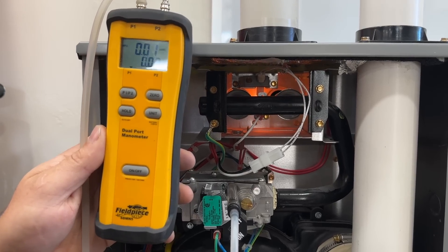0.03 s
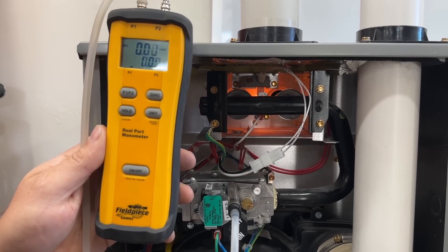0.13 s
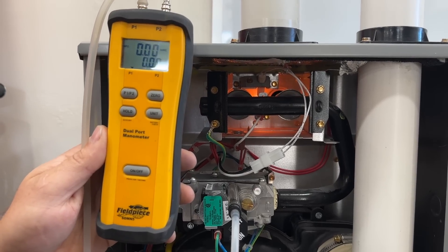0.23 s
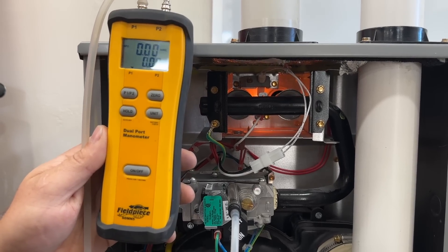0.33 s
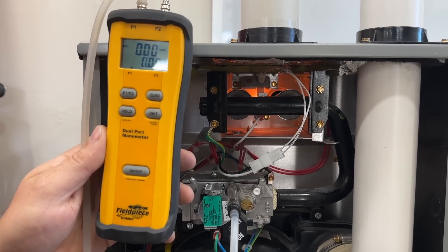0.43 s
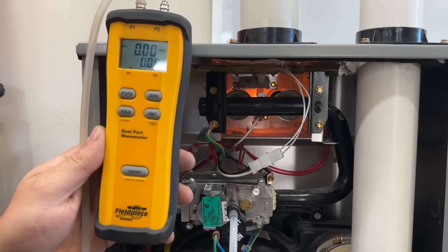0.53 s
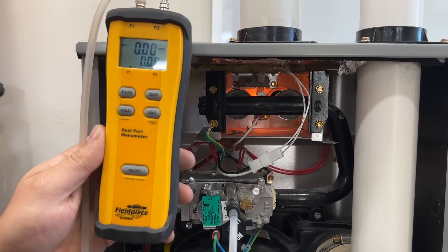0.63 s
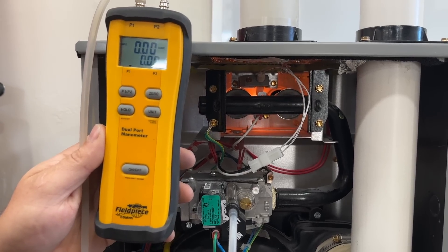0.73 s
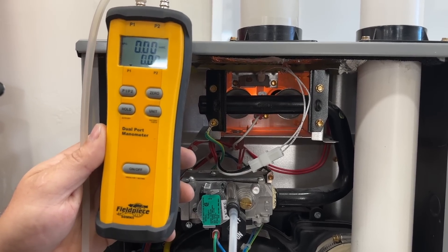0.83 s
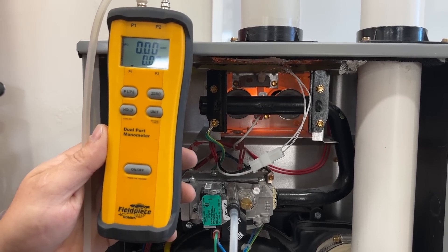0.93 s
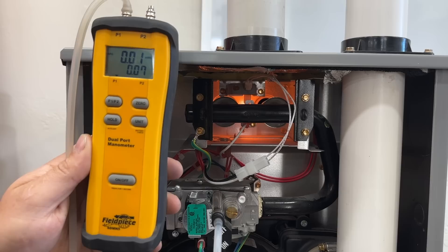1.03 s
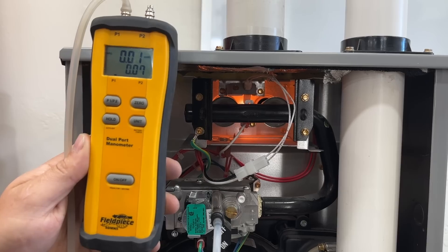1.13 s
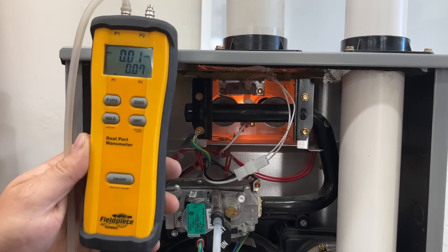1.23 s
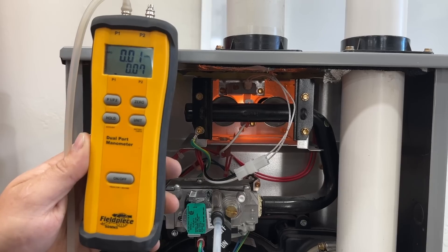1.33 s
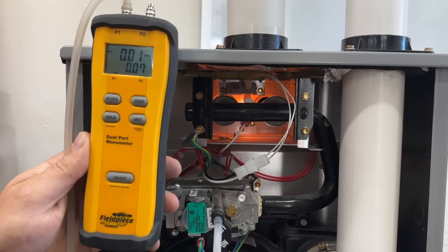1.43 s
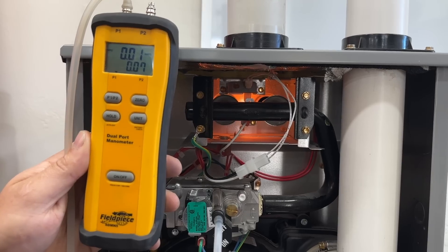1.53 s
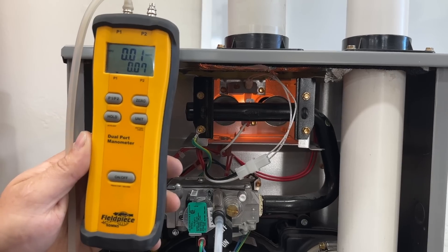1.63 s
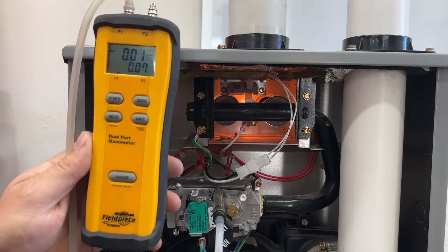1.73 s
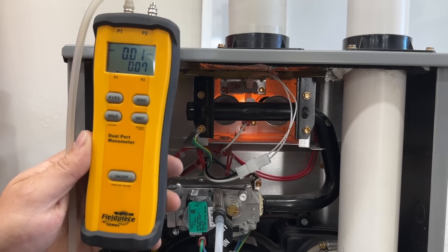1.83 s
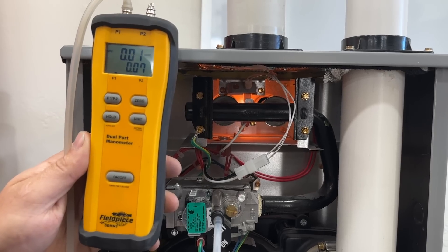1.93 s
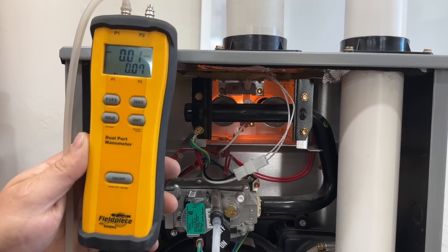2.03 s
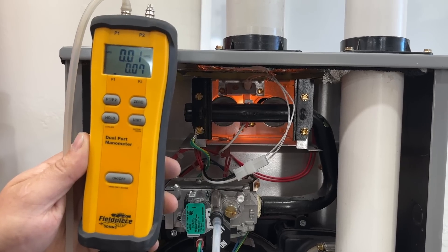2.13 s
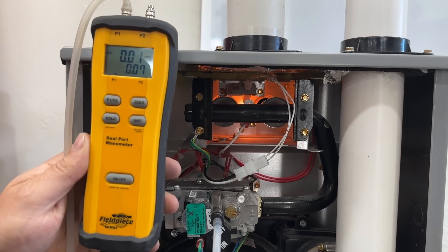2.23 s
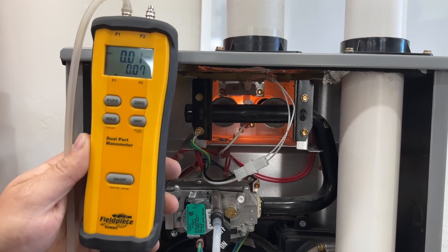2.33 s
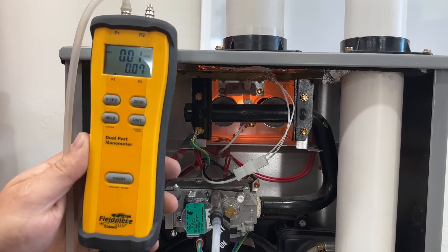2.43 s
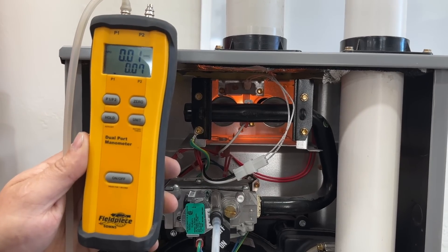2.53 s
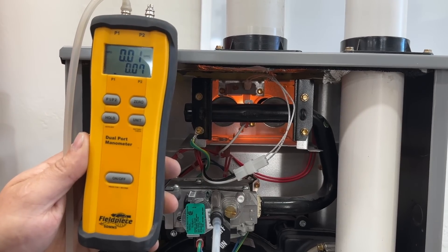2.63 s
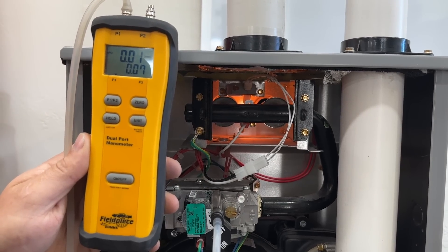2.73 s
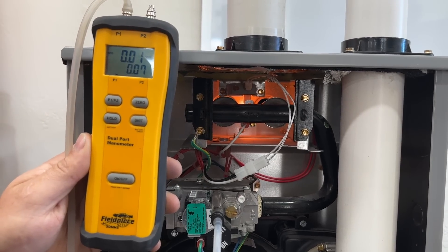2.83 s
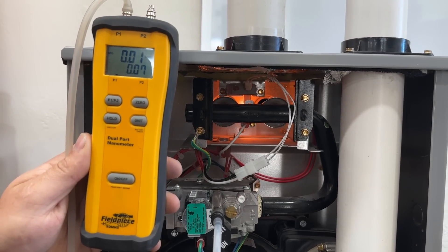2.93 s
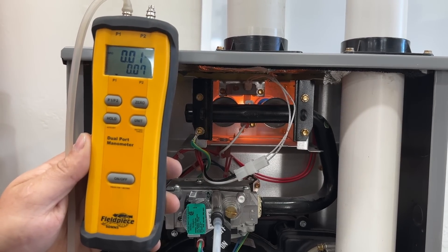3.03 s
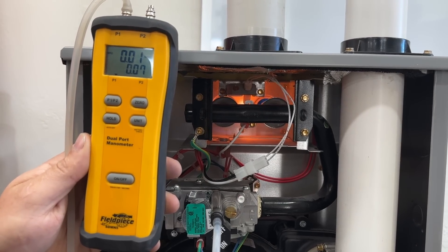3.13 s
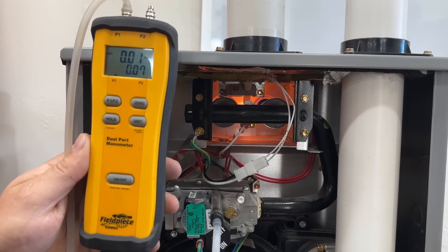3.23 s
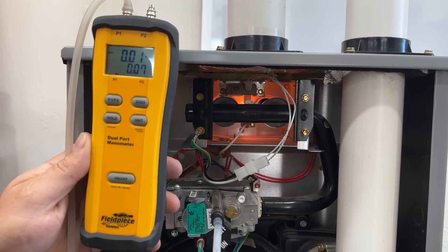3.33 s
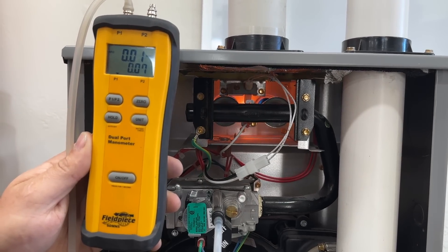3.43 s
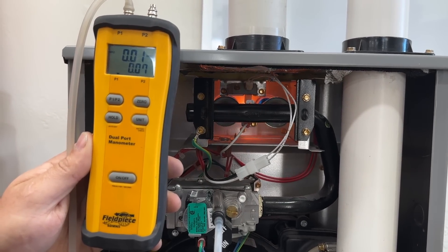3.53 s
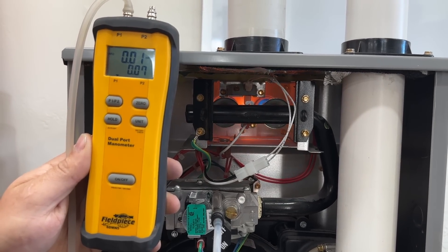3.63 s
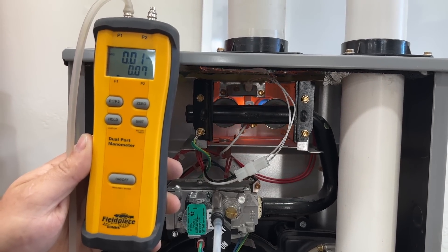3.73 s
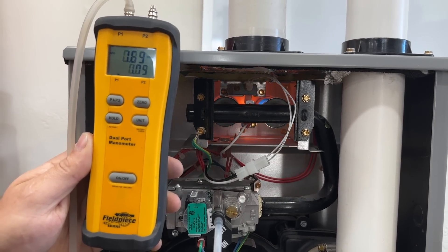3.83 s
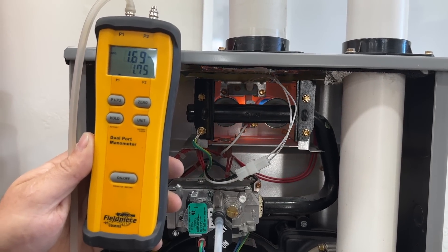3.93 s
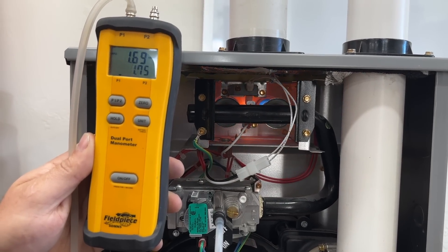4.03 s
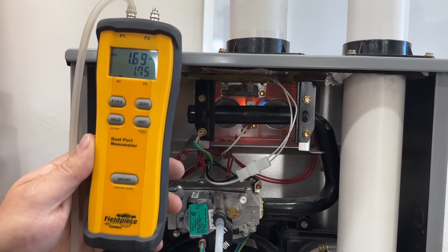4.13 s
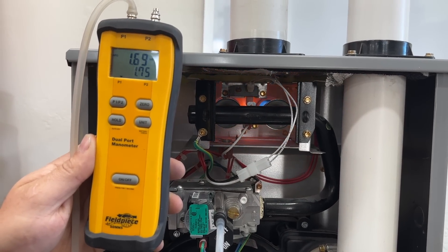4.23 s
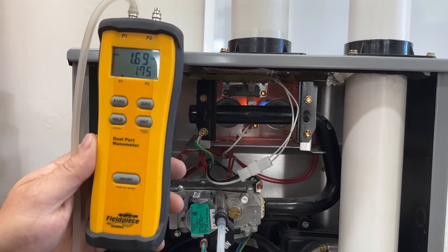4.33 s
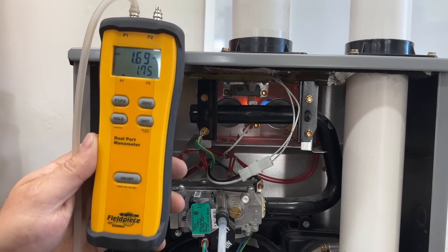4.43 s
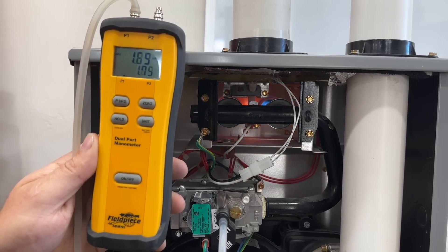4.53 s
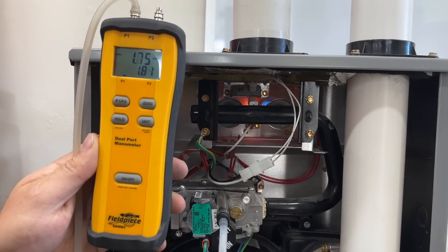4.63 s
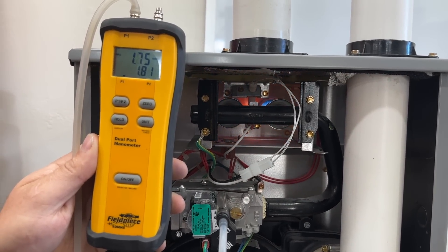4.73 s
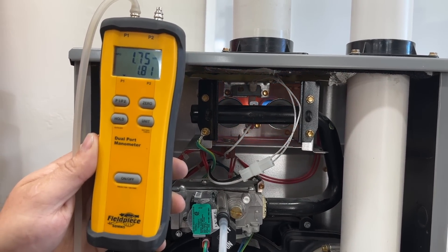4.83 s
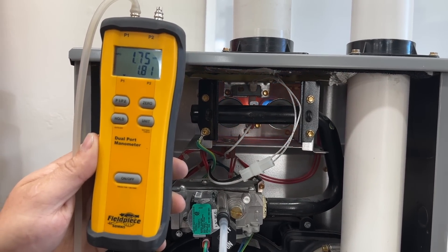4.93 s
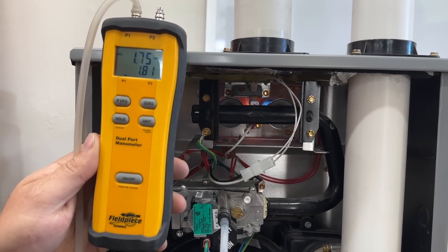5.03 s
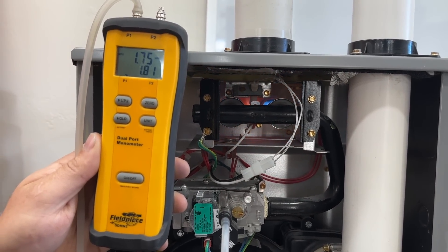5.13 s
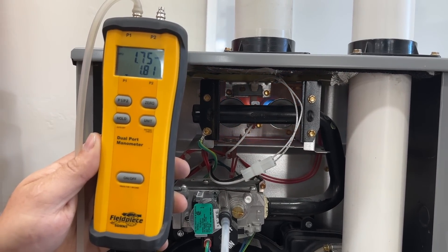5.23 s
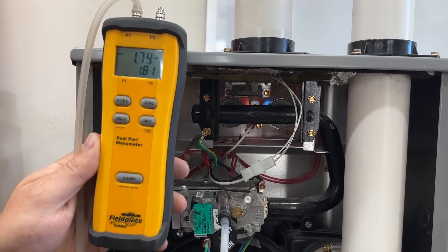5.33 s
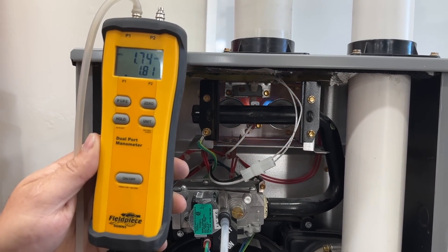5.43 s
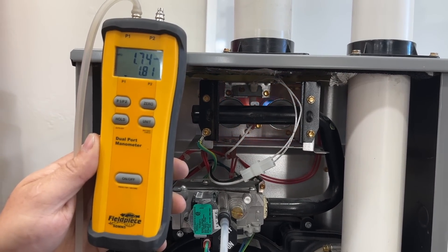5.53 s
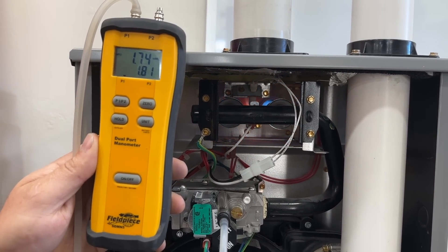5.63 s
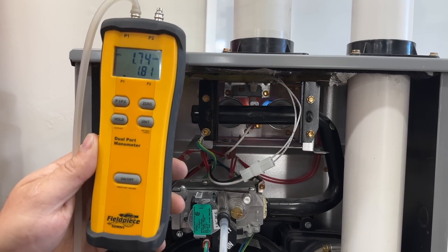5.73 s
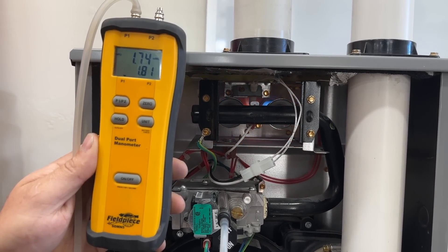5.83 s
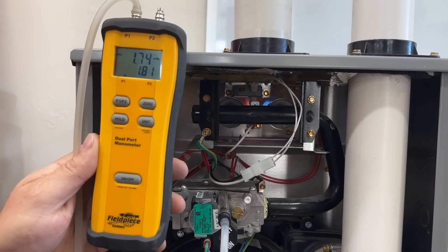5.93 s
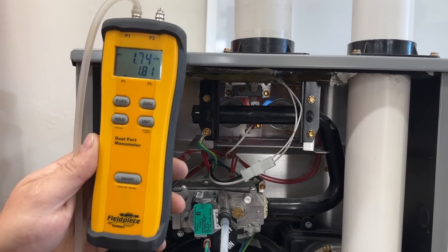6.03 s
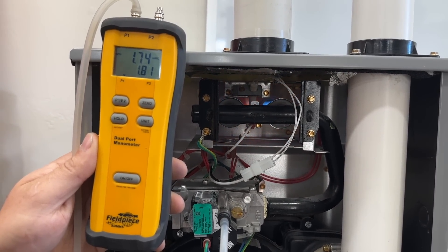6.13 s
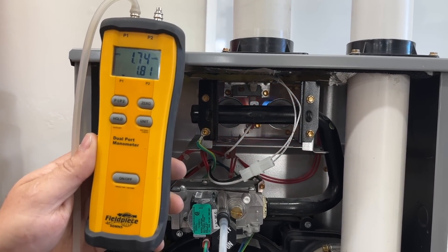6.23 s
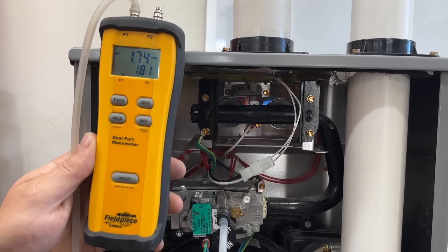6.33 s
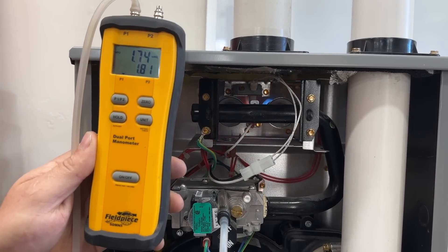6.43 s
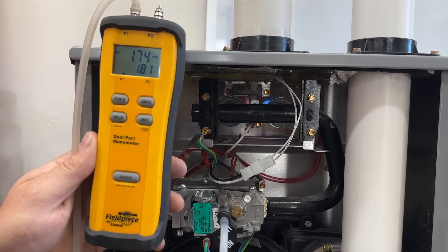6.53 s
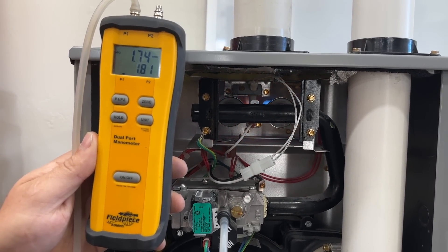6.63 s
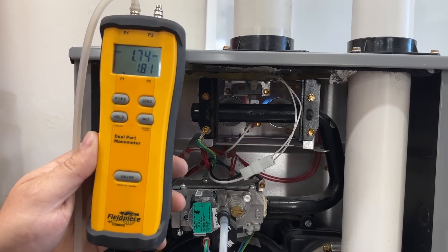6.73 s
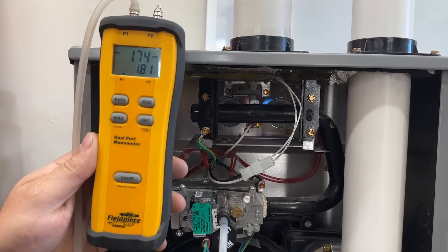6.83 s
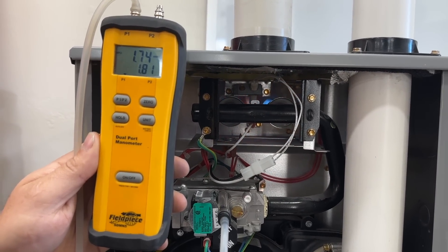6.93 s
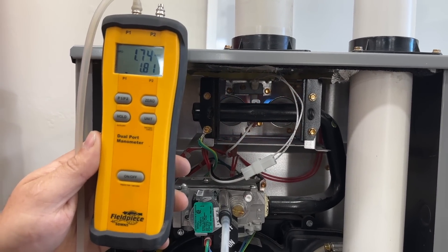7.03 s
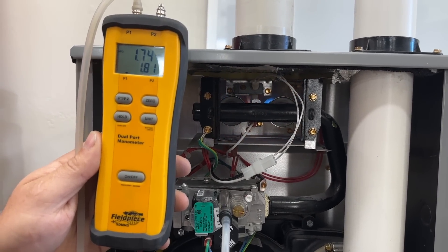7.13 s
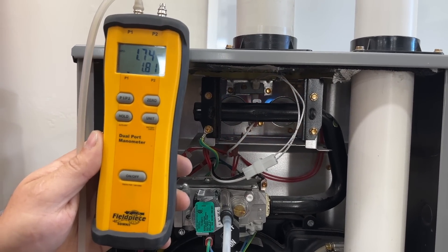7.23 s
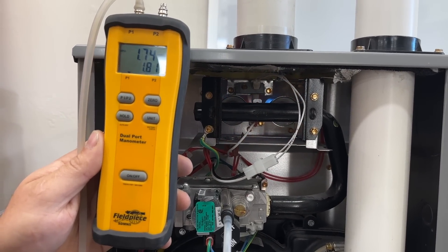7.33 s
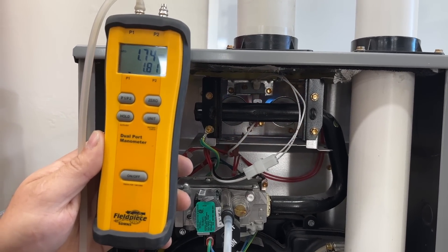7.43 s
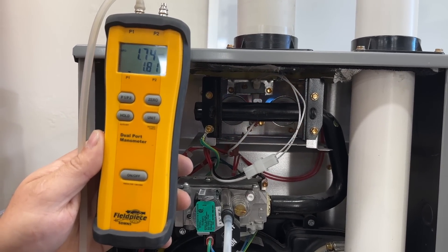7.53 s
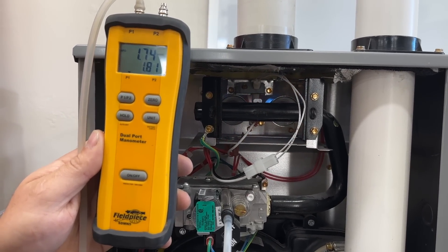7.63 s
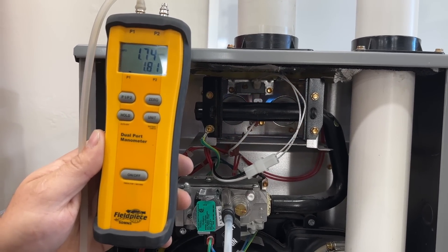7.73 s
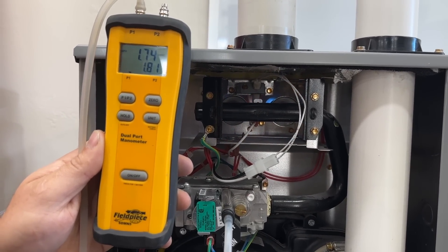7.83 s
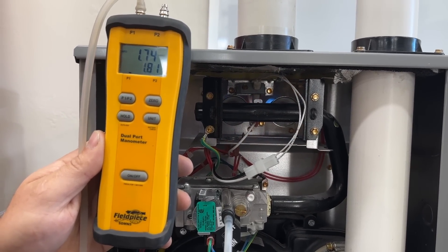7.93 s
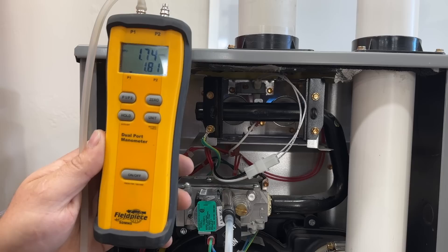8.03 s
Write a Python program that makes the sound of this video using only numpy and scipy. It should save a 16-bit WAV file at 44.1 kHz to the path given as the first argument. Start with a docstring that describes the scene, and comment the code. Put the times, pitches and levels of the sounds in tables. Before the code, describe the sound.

Close to an open gas furnace, a wavering fan drone runs until a small click, quick ignition pops and a sudden deep, steady burner rumble.

```python
"""A gas furnace heard from close by with its door off. From the start the draught fan hums and whines: its
air stream rings the flue, whose drone wavers unevenly in level. The gas valve rattles and snaps open, and gas
hisses from the jets as shaped noise. The first burner pops alight in short low rings, sputters, then all
burners flare and settle to a low roar, which is noise rung by the burner box."""
import sys
import numpy as np
from scipy import signal
from scipy.io import wavfile
from scipy.ndimage import uniform_filter1d

SR = 44100
rng = np.random.default_rng(int(sys.argv[2]) if len(sys.argv) > 2 else 0)


def bounce(signal):
    """Save signal as a 16-bit WAV file at the path given by the first command-line argument."""
    frames = np.transpose(np.atleast_2d(signal))
    limited = np.clip(frames, -1, 1)
    pcm = np.round(limited * 32767).astype(np.int16)
    wavfile.write(sys.argv[1], SR, pcm)


N = 356901  # samples

# Gas at the jets. Each row: time in seconds, hiss level in dB, share of the lit hiss in the power mix (0-1).
GAS_FLOW = [(2.36, -95, 0), (2.4, -54, 0.2), (2.5, -61.5, 0), (3.0, -62, 0.04), (3.1, -61, 0.26),
            (3.13, -56, 0.7), (3.2, -59, 0.35), (3.7, -58.5, 0.6), (3.82, -59, 0.97), (5, -59, 0.94),
            (8.1, -57.5, 0.98)]


def flames():
    """Combustion noise: turbulent burning excites the burner-box modes in surges, with a gusty upper rush."""
    # Roar spectrum. Each row: frequency in Hz, relative level in dB per Hz.
    roar_spectrum = [(25, -34), (55, -13.5), (95, -14.5), (200, -26.5), (300, -8), (340, -14), (375, -49),
                     (560, -40), (850, -28.5), (1200, -42), (2000, -41.5), (3000, -47.5), (5000, -66.5)]
    # Burner-box resonances. Each row: frequency in Hz, width in Hz, relative level in dB.
    box_modes = [(74.5, 20, -3), (128, 27.4, 0.5), (168.8, 23.2, 1), (229.3, 14, -3), (274.7, 31, -5),
                 (319.6, 19, -2), (445.4, 28, -15), (493, 33, -20.5), (537, 21, -19), (610, 25, -21.5),
                 (752, 73, -24), (1524, 230, -35.5)]
    # Roar below 400 Hz, one sputtering burner and then all. Each row: time in seconds, level in dB.
    flame_level = [(3.1, -36), (3.2, -39.5), (3.4, -41), (3.46, -30.5), (3.53, -38), (3.68, -30.5),
                   (3.76, -19.5), (3.92, -22.5), (4.05, -24), (4.3, -23), (5.15, -23.5), (5.7, -24.5),
                   (6.0, -23), (6.35, -22.5), (6.75, -23.5), (7.3, -24), (7.8, -21.5), (8.1, -23)]
    crossover_hz, deep_hz = 400, 100
    deep_start_db, deep_build_s = -6, 1.6
    surge_db, surge_top_hz = 1.5, 12
    spread_s, spread_rise_s, flare_end_s, settle_s = 3.7, 0.03, 3.92, 0.1
    rush_lone_db, rush_flare_db, rush_steady_db = -44, -19, -23
    start_s = flame_level[0][0]

    low, _ = split(noise(roar_spectrum, box_modes, patchy_db=0.3, size=8192), crossover_hz)
    deep, body = split(low, deep_hz)
    # the deepest rumble builds up slowly after the first flame
    low = body + deep * gain_of(deep_start_db * (1 - ramp(start_s, deep_build_s)))
    _, high = split(noise(roar_spectrum, box_modes, patchy_db=1.2, size=4096), crossover_hz)

    roar_db = curves(flame_level)[0] + surge_db * wander(top_hz=surge_top_hz, low_hz=3)
    roar = gain_of(roar_db) * held(low, firmness=0.29, seconds=0.055)

    rush_db = rush_lone_db + (rush_flare_db - rush_lone_db) * ramp(spread_s, spread_rise_s)
    rush_db = rush_db + (rush_steady_db - rush_flare_db) * ramp(flare_end_s, settle_s)
    rush = gain_of(rush_db + 1.6 * wander(top_hz=30.06, low_hz=5)) * high
    return ramp(start_s, 0.024) * (roar + rush)


def pops():
    """Impulsive ignition: each pocket of gas gives a pressure push, a damped low sine, and a puff of noise."""
    # Each row: start in seconds, gain of the sine in dB, pitch in Hz, time to fall 60 dB in seconds,
    # gain of the puff in dB.
    pop_events = [(3.0135, -12.5, 222, .055, -46), (3.044, -27, 190, .07, -38), (3.052, -21, 215, .05, -44),
                  (3.0595, -13, 262, .05, -36), (3.0675, -20, 95, .09, -50)]
    # Puff spectrum. Each row: frequency in Hz, relative level in dB per Hz.
    puff_spectrum = [(300, 0), (750, 2), (1200, -8), (1900, -4), (3000, -23), (6000, -26), (10400, -35)]
    out = np.zeros((2, N))
    puff = noise(puff_spectrum, size=512)
    t = np.arange(SR // 4) / SR
    for start_s, db, hz, t60, puff_db in pop_events:
        at = event_slice(start_s, len(t))
        envelope = gain_of(-60 * t / t60) * (1 - np.exp(-t / 0.00066))
        push = -gain_of(db) * np.sin(2 * np.pi * hz * t)  # first swing negative
        out[:, at] += envelope * (gain_of(puff_db) * puff[:, at] + push)
    return out


def valve():
    """Impact excitation: the plunger rattles as it lifts, then strikes and rings its casing's modes."""
    # Strikes, the last one the casing jolted amid the pops. Each row: start in seconds, gain in dB,
    # time for the rattle to fall 60 dB in seconds, casing ring relative to that gain in dB.
    strikes = [(2.359, -41.5, 0.11, -20), (2.3665, -35, 0.049, -18), (2.378, -35.5, 0.088, 6),
               (2.4, -47, 0.068, 5), (3.058, -51, .03, 6)]
    # Casing modes. Each row: frequency in Hz, relative level in dB, time to fall 60 dB in seconds.
    casing_modes = [(1850, 4, 0.033), (1980, 0, 0.034), (3870, -7, 0.023), (5350, -14, 0.022),
                    (6040, -13, 0.037), (7000, -8, .025)]
    # Rattle spectrum. Each row: frequency in Hz, relative level in dB per Hz.
    rattle_spectrum = [(800, -9), (2000, -1), (6000, -1.5), (9500, -10.5), (12500, -8), (15500, -10)]
    out = np.zeros((2, N))
    rattle = noise(rattle_spectrum, size=256)
    t = np.arange(SR // 4) / SR
    lead = 1.35 * np.array([[0.5], [-0.5]])  # radians; left leads, the valve sitting to one side
    ring = sum(gain_of(db - 60 * t / t60) * np.sin(2 * np.pi * hz * t + lead) for hz, db, t60 in casing_modes)
    for start_s, db, t60, ring_db in strikes:
        at = event_slice(start_s, len(t))
        rise = 1 - np.exp(-t / 0.0006)
        fading_rattle = gain_of(-60 * t / t60 - 3.0) * rattle[:, at]
        out[:, at] += gain_of(db) * rise * (fading_rattle + gain_of(ring_db) * ring)
    return out


def gas():
    """Turbulent jet noise: the hiss moves up in pitch as the burners catch, and flutters in level."""
    # Hiss spectra, unlit and lit. Each row: frequency in Hz, relative level in dB per Hz.
    unlit_spectrum, lit_spectrum = [(3000, -19.5), (5000, -14.5), (5150, -3.5), (6500, -6), (7300, -8.5),
                                    (7700, -21.5), (8200, -11), (9650, -17), (9800, -37.5)], [(3000, -15), (4800, -8), (5500, -9), (6900, -5),
                                                   (7500, -5.5), (7750, -12.5), (8050, -6), (9400, -7),
                                                   (10400, -6.5)]
    # Narrow whistles of the jets. Each row: frequency in Hz, width in Hz, relative level in dB.
    unlit_whistles, lit_whistles = [(5180, 60, -2.5), (5360, 100, 5.5)], [(6220, 65, -2), (6830, 110, 0.5),
                                                           (7270, 45, -0.16)]
    flow_db, lit_share = curves(GAS_FLOW)
    lit_share = np.clip(lit_share, 0, 1)
    unlit = noise(unlit_spectrum, unlit_whistles, patchy_db=1.5)
    lit = noise(lit_spectrum, lit_whistles, patchy_db=1.7)
    hiss = np.sqrt(1 - lit_share) * unlit + np.sqrt(lit_share) * lit  # equal-power crossfade
    return gain_of(flow_db + 0.4 * wander(top_hz=29.8)) * hiss


def fan():
    """Forced flow in a resonant duct: air noise and drone of the flue, blade harmonics and motor whines."""
    # Air stream. Each row: frequency in Hz, relative level in dB per Hz.
    air_spectrum = [(25, -42), (50, -15), (105, -34), (165, -27.5), (300, -26), (455, -24.5), (530, -27.5),
                    (860, -30), (1150, -32), (2200, -40), (4700, -47.5), (7300, -56.5), (9500, -63),
                    (9900, -89.5)]
    # Flue and housing resonances the air rings. Each row: frequency in Hz, width in Hz, relative level in dB.
    flue_modes = [(58, 10, -17), (76, 15, -11), (97, 10, -19), (130, 17, -8), (194, 8, -15), (362, 25, -21),
                  (432, 25, -22), (640, 90, -24), (745, 70, -17), (1070, 50, -30), (1420, 200, -32),
                  (1920, 150, -37), (2500, 200, -44), (3400, 600, -47), (6100, 400, -50), (6750, 300, -55)]
    # The strongest flue resonances, which drone. Each row: frequency in Hz, width in Hz, relative level in dB.
    drone_modes = [(234, 6, 0), (252, 12, -9)]
    # Drone, sagging once the flame changes the gas column. Each row: time in seconds, level in dB before dips.
    drone_level = [(0, -37.5), (.4, -32), (.55, -38), (.75, -32.5), (1.15, -37.5), (1.3, -36), (1.9, -37.5),
                   (2.15, -35), (2.7, -36), (2.99, -34.5), (3.14, -34.5), (3.3, -39.5), (3.7, -36.5),
                   (8.1, -46.5)]
    # Blade-passing pitch; hot, thin flue gas lets the fan run faster. Each row: time in seconds, pitch in Hz.
    blade_pitch = [(0, 477.7), (2.5, 478.8), (4.2, 480.5), (8.1, 479.7)]
    # Blade harmonics 1 to 5. Each row: cold level in dB, hot level in dB, left minus right in dB,
    # lead of the left in radians.
    blade_harmonics = [(-47, -51.5, 2, 1), (-56.5, -54.5, 5.5, -0.87), (-61.5, -62, -0.5, -1.3),
                       (-66.5, -62.5, -2.5, -.06), (-82.5, -72.5, -2.5, 1)]
    # Motor whines. Each row: cold pitch in Hz, hot pitch in Hz, level in dB, left minus right in dB,
    # lead of the left in radians.
    motor_whines = [(382.5, 383.5, -48.5, 1.3, .16), (3046, 3052, -74, .3, 1.3), (3122, 3127, -75, .3, 1.3),
                    (3170, 3174, -71, .3, 2.1), (3195, 3200, -72, .3, .9), (3229, 3233, -74.5, .8, 1.5),
                    (3332, 3338, -71, 2.2, 1.6), (3353, 3357, -67, 2.2, 2.1),
                    (3381, 3386.5, -59, 3.1, 1.66), (3428, 3432, -73, 1.2, 2.3), (3476, 3481, -72, .6, 2.5),
                    (3550, 3558, -70, .6, .6), (3592, 3599, -72, -.6, .65), (3638, 3644, -76, -.6, .7),
                    (6088, 6096, -76.5, -2.2, .16)]
    air_db = -38

    blade_hz, = curves(blade_pitch)
    warm = np.clip((blade_hz - blade_hz[0]) / (blade_hz[-1] - blade_hz[0]), 0, 1)
    air = noise(air_spectrum, flue_modes, patchy_db=0.93, size=8192)
    out = gain_of(air_db + 0.49 * wander(top_hz=6)) * air

    drone = noise([(20, -80), (400, -80)], drone_modes, size=8192)  # faint flat floor below 400 Hz
    out += gain_of(curves(drone_level)[0] + drone_wavering()) * held(drone, firmness=0.81, seconds=0.069)

    for k, (cold_db, hot_db, side_db, lead) in enumerate(blade_harmonics, 1):
        db = cold_db + warm * (hot_db - cold_db)
        out += tone(k * blade_hz, db, side_db, lead, drift_hz=0.4 * k, waver_db=1.05)

    for cold_hz, hot_hz, db, side_db, lead in motor_whines:
        hz = cold_hz + warm * (hot_hz - cold_hz)
        # fainter whines waver more
        drift_hz = 0.81 + 0.12 * (-59 - db)
        waver_db = 2.0 + 0.091 * (-58.5 - db)
        out += tone(hz, db, side_db, lead, drift_hz, waver_db)
    return out


def drone_wavering():
    """Amplitude modulation: brief bell-shaped dips of the drone level, in dB."""
    # Each row: centre in seconds, depth in dB, length between the 1/e points in seconds.
    brief_dips = [(0.245, -8, 0.032), (0.337, -16, 0.056), (0.475, -7, .03), (0.646, -9, 0.033),
                  (0.932, -11, 0.028), (1.11, -8, 0.045), (1.606, -13, 0.074), (1.937, -6, 0.033),
                  (2.05, -13, 0.071), (2.32, -7, 0.043), (3.196, -16, 0.073), (3.48, -12, 0.13)]
    t = np.arange(N) / SR
    return sum(db * np.exp(-(2 * (t - centre_s) / length) ** 2) for centre_s, db, length in brief_dips)


def sheen():
    """Band-limited noise: a thin top hiss whose level rises with the share of the lit jet hiss."""
    # Each row: frequency in Hz, relative level in dB per Hz.
    sheen_spectrum = [(12150, -42.5), (12700, -6.5), (14000, -4.5), (14550, -9.5), (15050, -0.5),
                      (15800, -7.5)]
    cold_db, lit_db = -69.5, -64.5
    lit_share = np.clip(curves(GAS_FLOW)[1], 0, 1)
    return gain_of(cold_db + (lit_db - cold_db) * lit_share) * noise(sheen_spectrum, patchy_db=0.7)


def noise(spectrum, modes=(), patchy_db=0.0, size=1024):
    """Spectral shaping: stereo noise of rms 1 with resonances and drifting louder patches, frame by frame."""
    # Likeness of left and right. Each row: frequency in Hz, coherence (0-1).
    likeness = [(35, .93), (62, 1), (300, 0.98), (520, 0.69), (800, 0.92), (1300, 0.3), (2000, 0.72),
                (2400, 0.32), (2900, 0.59), (3700, 0.24), (4400, 0.29), (4900, 0.22), (6000, 0.67),
                (7700, .15), (8300, 0.76), (9700, 0.6), (12600, .55), (13900, .99), (15000, .99),
                (15700, .7)]
    hz = np.fft.rfftfreq(size, 1 / SR)
    frames = 4 * N // size + 5
    power = gain_of(2 * read(spectrum, hz)) * (hz < spectrum[-1][0])  # silent above the last point
    for f, width, db in modes:
        power += gain_of(2 * db) / (1 + ((hz - f) / width) ** 2) ** 3
    a, b, c, d, patch = rng.standard_normal((frames, len(hz), 5)).T
    patch = uniform_filter1d(patch, size=size // 64, axis=0)  # smooth over frequency
    patch = evened(uniform_filter1d(patch, size=8, axis=1))  # smooth over time
    same = np.clip(read(likeness, hz), -1, 1)[:, None]
    left = a + 1j * b
    right = same * left + np.sqrt(1 - same ** 2) * (c + 1j * d)
    bins = np.array([left, right]) * ports(hz)[:, :, None]
    bins *= np.sqrt(power)[:, None] * gain_of(patchy_db * patch)
    _, x = signal.istft(bins, nperseg=size, noverlap=size * 3 // 4)
    return evened(x[:, :N])


def ports(hz):
    """Stereo level and phase differences: complex gains of the two microphone ports."""
    # Each row: frequency in Hz, left minus right in dB.
    tilt = [(200, 0), (450, 3), (770, -1.5), (1400, 1.5), (2400, -2.5), (3400, 1), (3800, -0.5),
            (5200, -2.5), (6700, -1.5), (7500, 5), (8300, 0.5), (9500, 0)]
    # Each row: frequency in Hz, lead of the left in radians.
    phase_lead = [(0, 0), (300, .06), (800, .35), (1550, -1.2), (2100, .5), (3300, 1.6), (3900, 1.1),
                  (4700, 3.2), (6100, 6.3), (7300, 8.5), (7900, 6.3), (8800, 5.9), (10500, 3.2), (12300, 3),
                  (13700, 0), (15800, -.3)]
    half = gain_of(read(tilt, hz) / 2) * np.exp(0.5j * read(phase_lead, hz))
    return np.array([half, 1 / half])


def tone(hz, db, side_db, lead, drift_hz, waver_db):
    """Frequency and amplitude modulation: a stereo sine that wanders in pitch and flutters in level."""
    turns = np.cumsum(hz + drift_hz * wander(top_hz=12)) / SR + rng.random()
    half = np.array([[0.5], [-0.5]])  # left, right
    level_db = db + waver_db * wander(top_hz=40.5, low_hz=2.5) + half * side_db
    return np.sqrt(2) * gain_of(level_db) * np.cos(2 * np.pi * turns + half * lead)


def wander(top_hz, low_hz=0.2):
    """Random-phase superposition: 16 slow sines, weaker as they quicken, sum to a drift of rms 1."""
    t = np.arange(0, N + 256, 256) / SR
    rates = np.geomspace(low_hz, top_hz, num=16)
    x = sum(np.sin(2 * np.pi * (f * t + rng.random())) / np.sqrt(f) for f in rates)
    return np.interp(np.arange(N) / SR, t, evened(x))


def held(x, firmness, seconds):
    """Level compression: irons out the slow swells of a noise, to rms 1, so its level follows a curve."""
    level = np.sqrt(uniform_filter1d((x ** 2).mean(0), size=max(round(seconds * SR), 2)) + 1e-4)
    return evened(x / level ** np.clip(firmness, 0, 1))


def split(x, hz):
    """Complementary crossover: a zero-phase low part and the remainder above it."""
    low = signal.sosfiltfilt(signal.butter(N=4, Wn=hz, fs=SR, output="sos"), x)
    return low, x - low


def ramp(start, seconds):
    """Linear onset: rises from 0 to 1 along a straight line."""
    return np.clip((np.arange(N) / SR - start) / seconds, 0, 1)


def event_slice(start_s, length):
    """Time to samples: the stretch that a short event fills."""
    first = round(start_s * SR)
    return slice(first, first + length)


def curves(rows):
    """Linear interpolation: every column of a table over time, one value a sample."""
    s, *columns = np.transpose(rows)
    return [np.interp(np.arange(N) / SR, s, c) for c in columns]


def read(points, hz):
    """Logarithmic frequency scale: interpolates a table over log frequency."""
    f, value = np.transpose(points)
    return np.interp(np.log(hz + 1), np.log(f + 1), value)


def evened(x):
    """Power normalisation: scales to rms 1."""
    return x / np.sqrt(np.mean(x ** 2) + 1e-20)


def gain_of(db):
    """Decibel law: decibels to an amplitude factor."""
    return 10 ** (np.asarray(db) / 20)


def scene():
    """Superposition: all sources add."""
    return fan() + sheen() + gas() + flames() + pops() + valve()


def record(dry):
    """Linear filtering: the deepest bass is thinned, the treble has a gap, and the top ends near 15.8 kHz."""
    # Edges of the treble gap: low edge in Hz, high edge in Hz.
    gap_hz = 10450, 11950
    edge_hz = 15790
    dry = signal.sosfilt(signal.butter(N=2, Wn=52, btype="high", fs=SR, output="sos"), dry)
    gap = signal.firwin(511, gap_hz, window=("kaiser", 9), fs=SR)
    edge = signal.firwin(1023, edge_hz, window=("kaiser", 10), fs=SR)
    return signal.oaconvolve(dry, np.convolve(gap, edge)[None], "same")


dry = scene()
out = record(dry)
bounce(out)
```